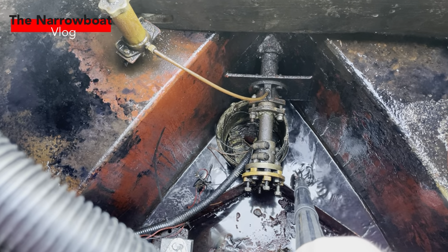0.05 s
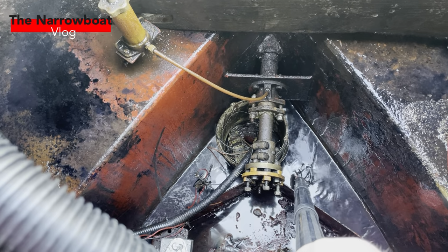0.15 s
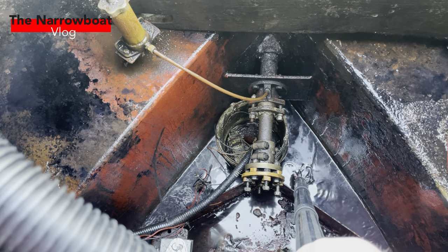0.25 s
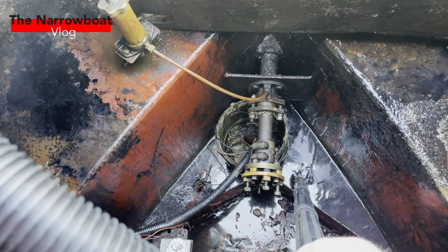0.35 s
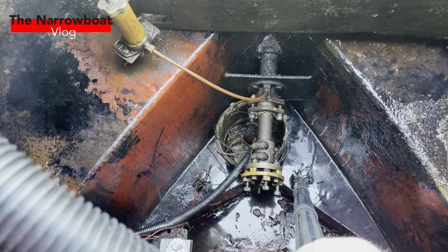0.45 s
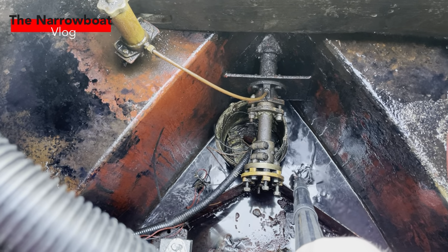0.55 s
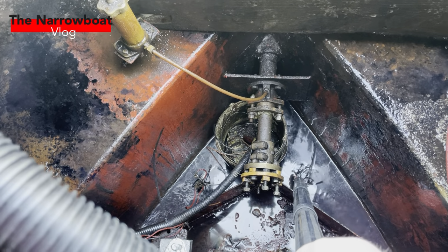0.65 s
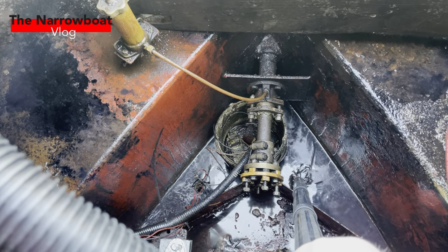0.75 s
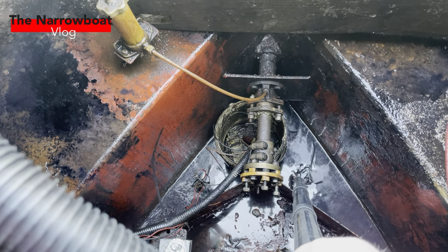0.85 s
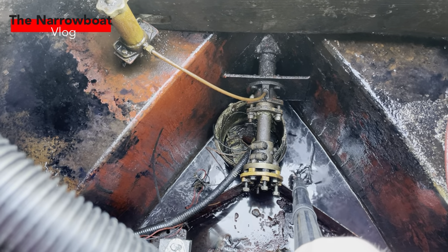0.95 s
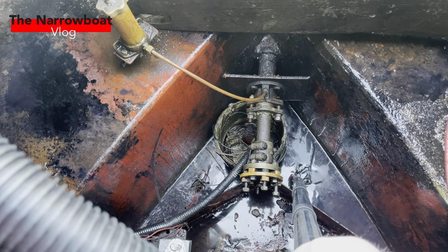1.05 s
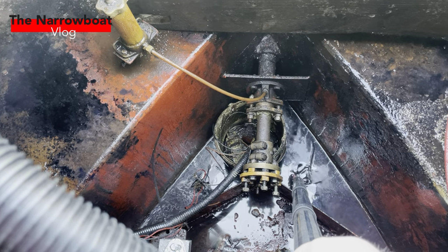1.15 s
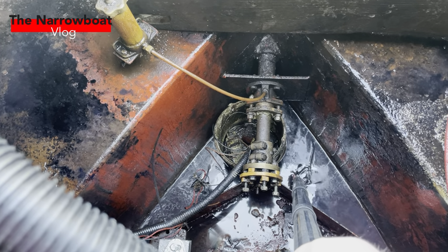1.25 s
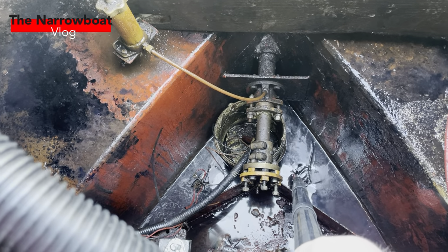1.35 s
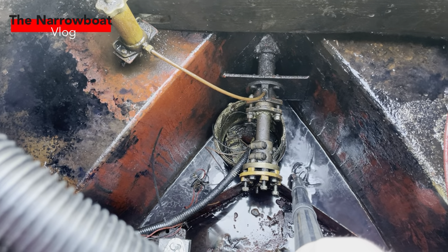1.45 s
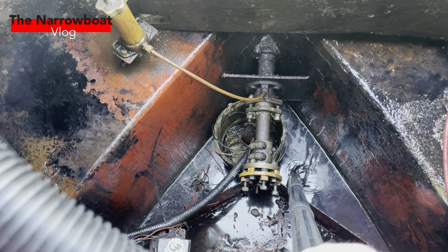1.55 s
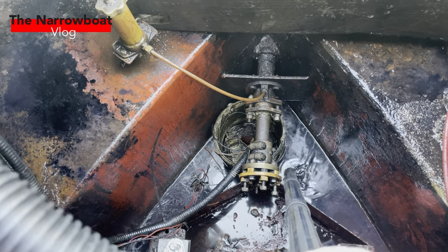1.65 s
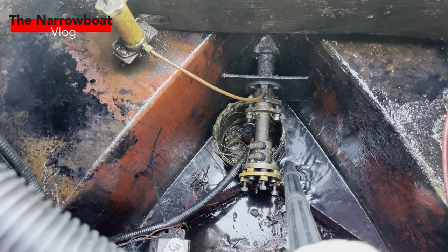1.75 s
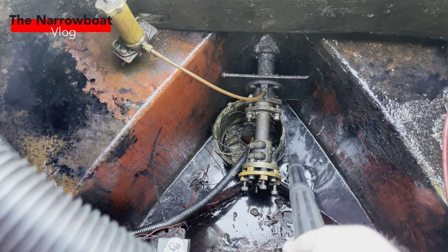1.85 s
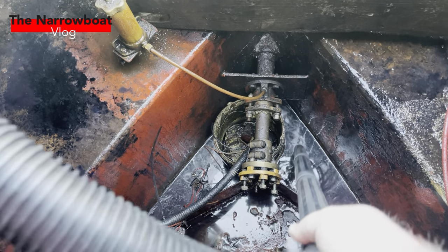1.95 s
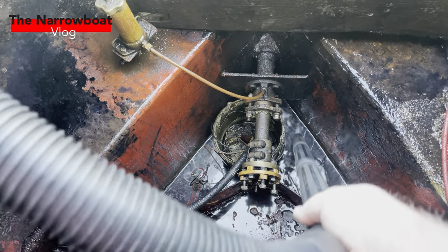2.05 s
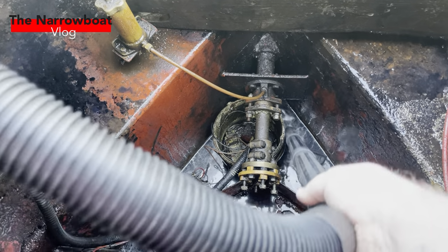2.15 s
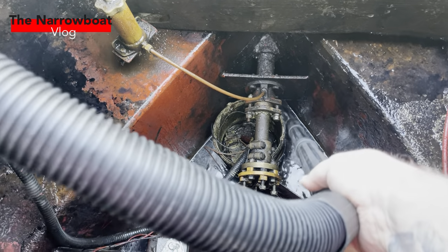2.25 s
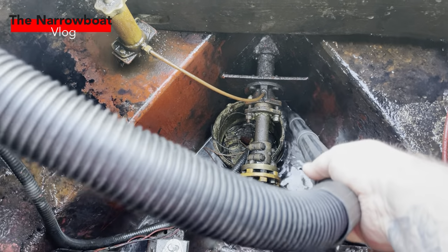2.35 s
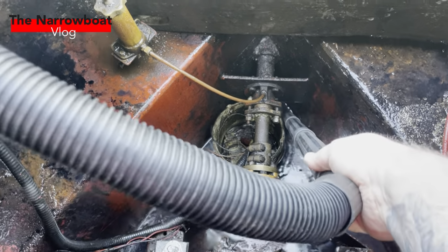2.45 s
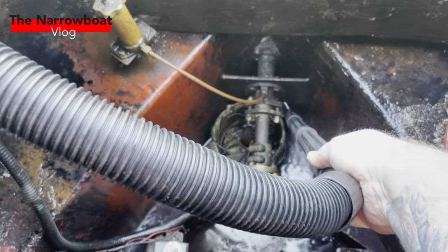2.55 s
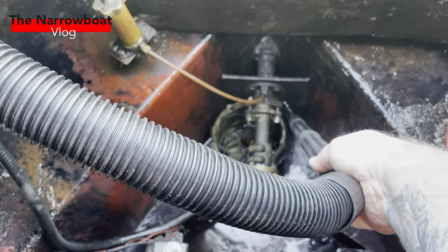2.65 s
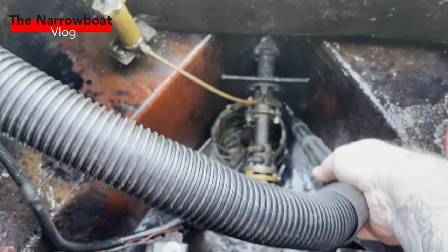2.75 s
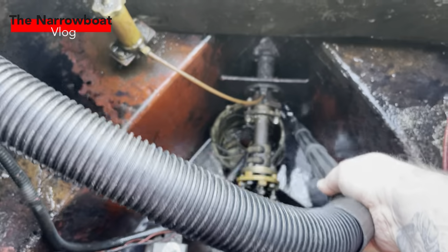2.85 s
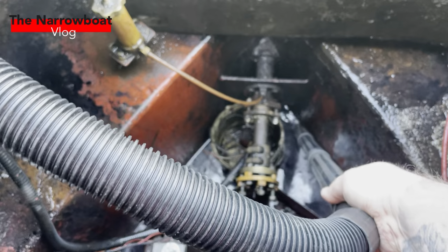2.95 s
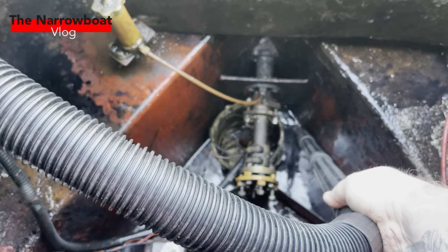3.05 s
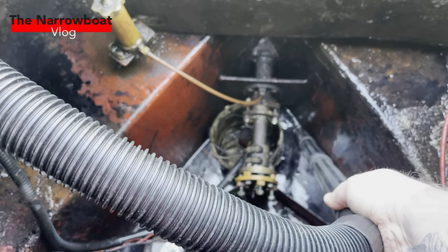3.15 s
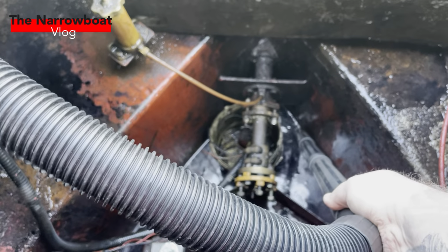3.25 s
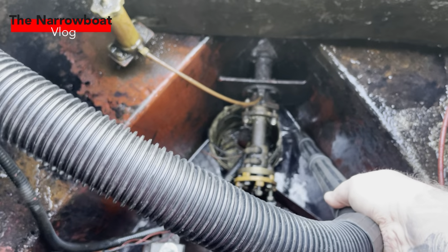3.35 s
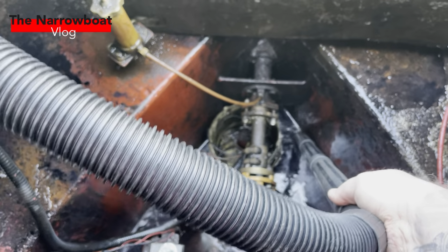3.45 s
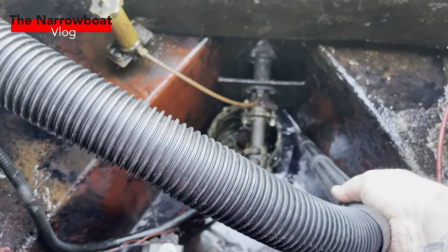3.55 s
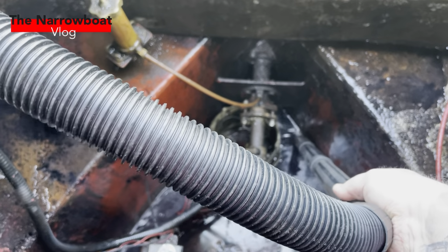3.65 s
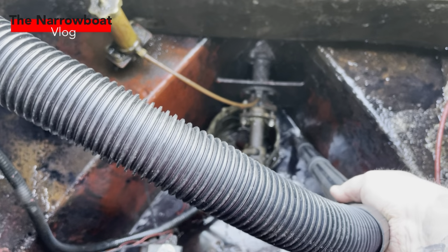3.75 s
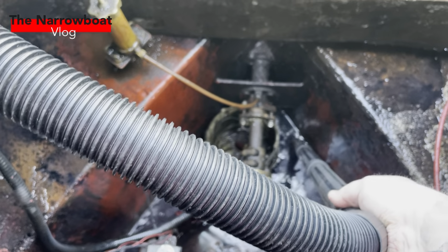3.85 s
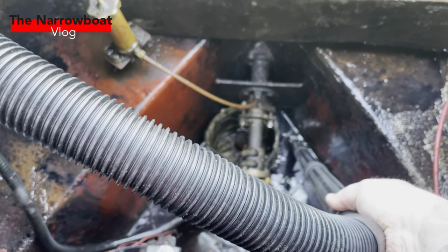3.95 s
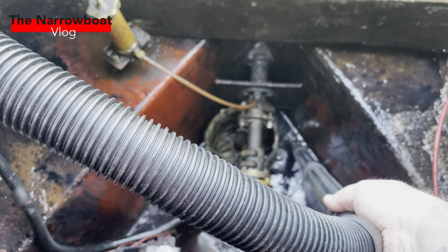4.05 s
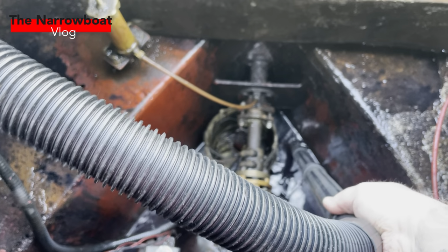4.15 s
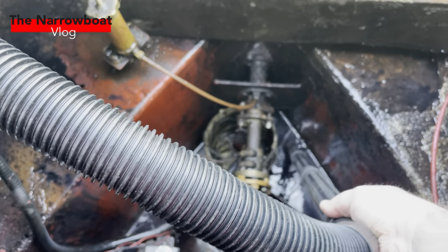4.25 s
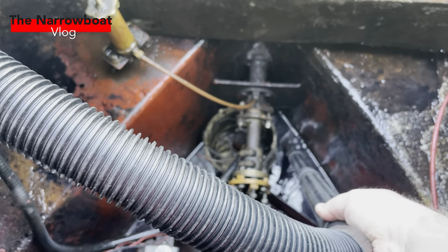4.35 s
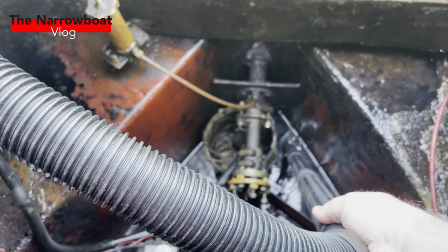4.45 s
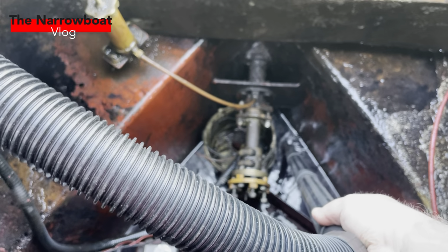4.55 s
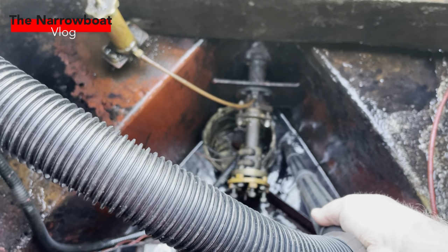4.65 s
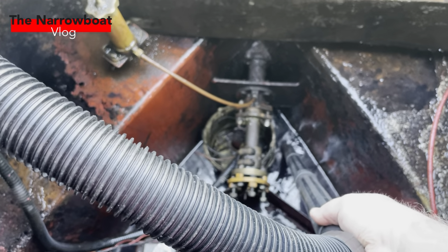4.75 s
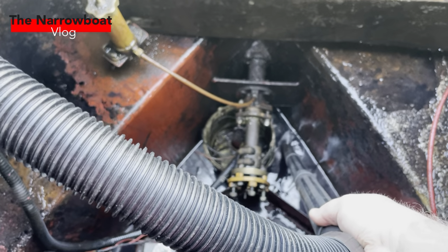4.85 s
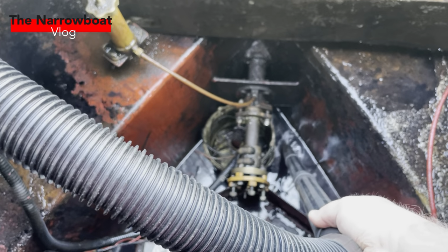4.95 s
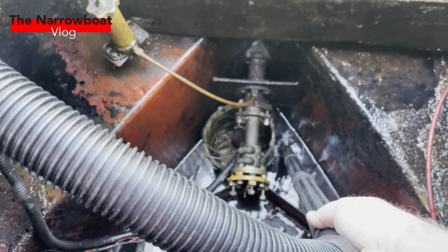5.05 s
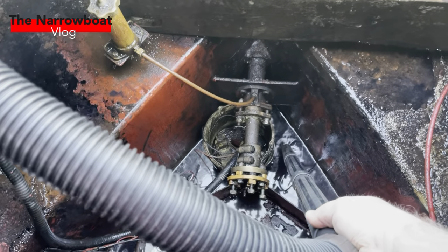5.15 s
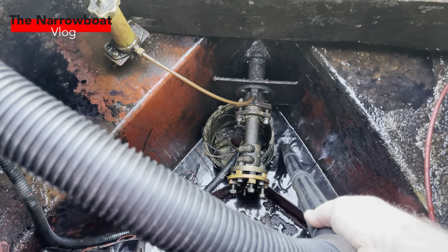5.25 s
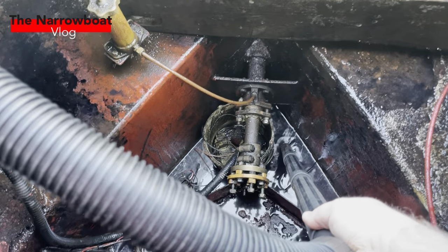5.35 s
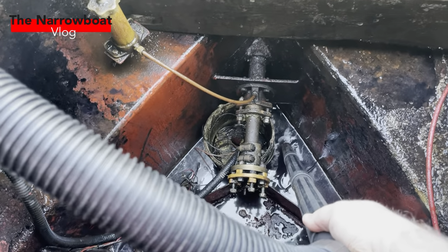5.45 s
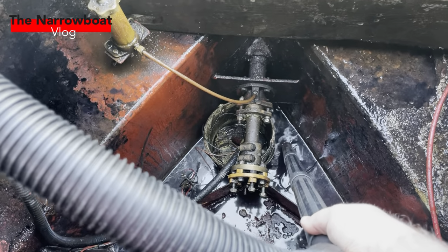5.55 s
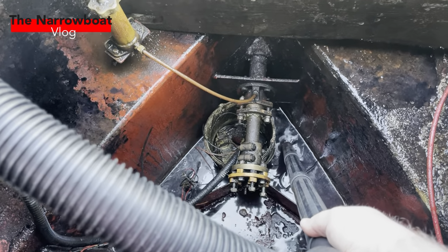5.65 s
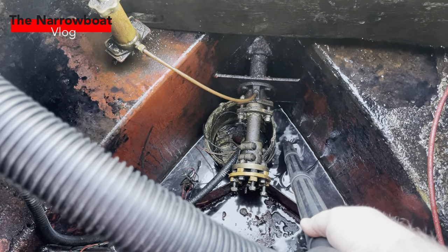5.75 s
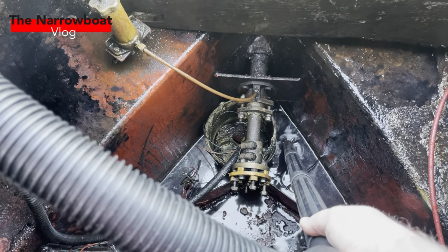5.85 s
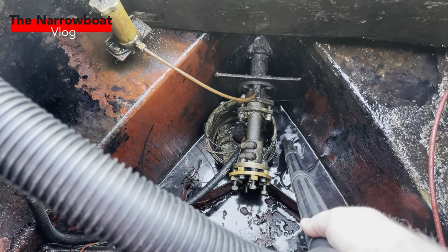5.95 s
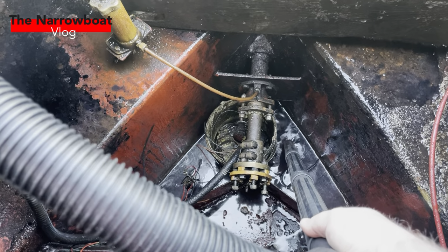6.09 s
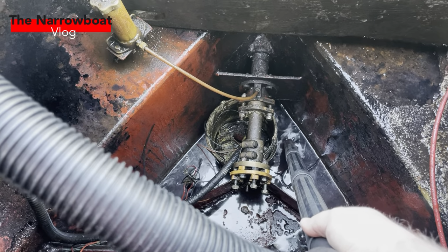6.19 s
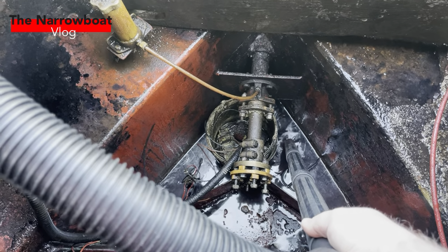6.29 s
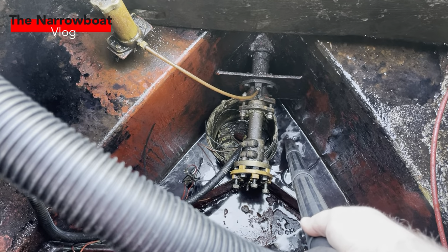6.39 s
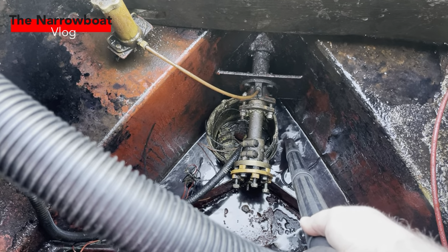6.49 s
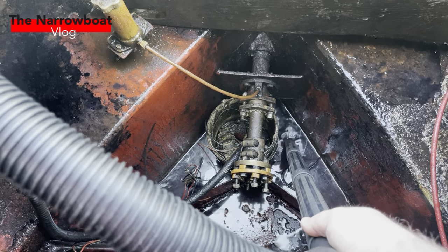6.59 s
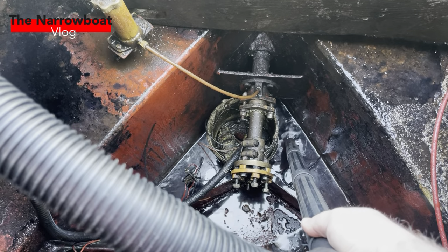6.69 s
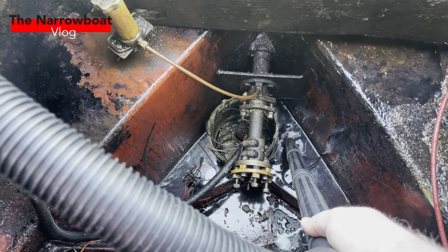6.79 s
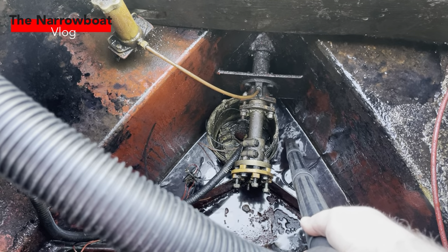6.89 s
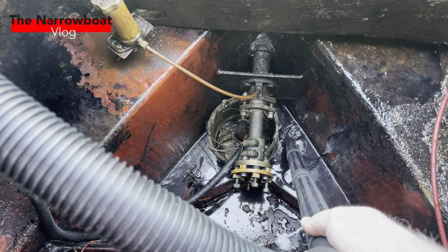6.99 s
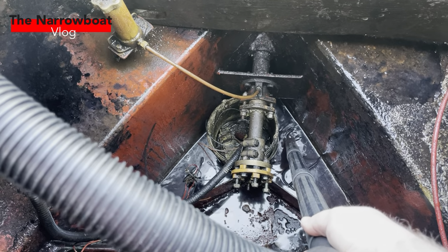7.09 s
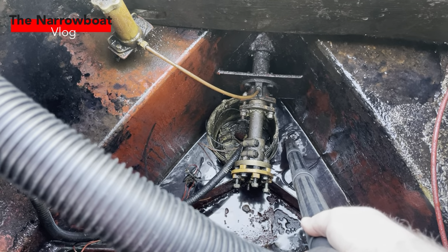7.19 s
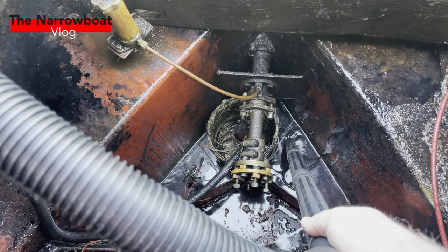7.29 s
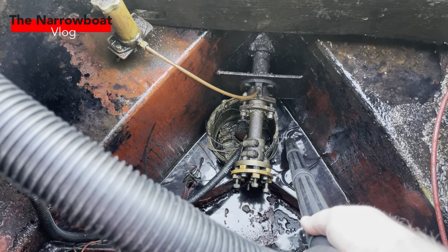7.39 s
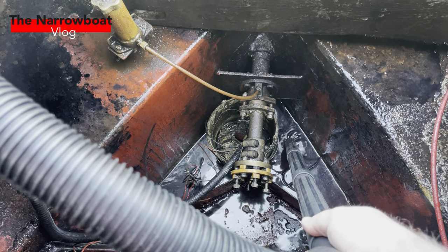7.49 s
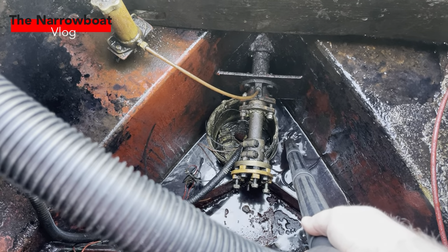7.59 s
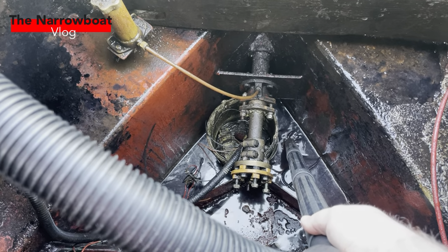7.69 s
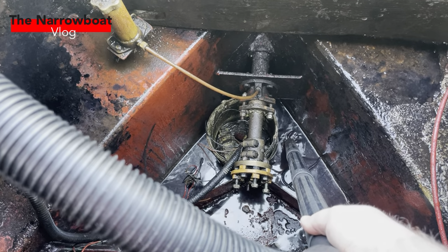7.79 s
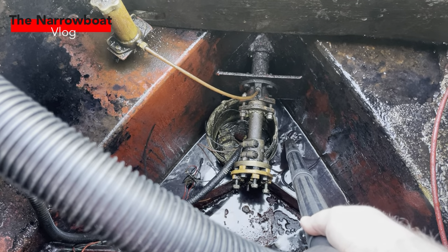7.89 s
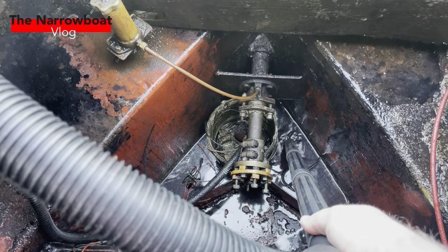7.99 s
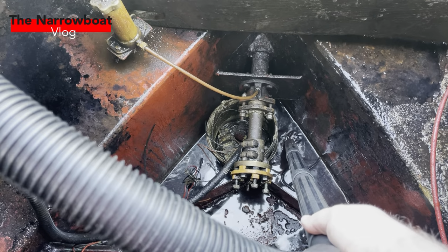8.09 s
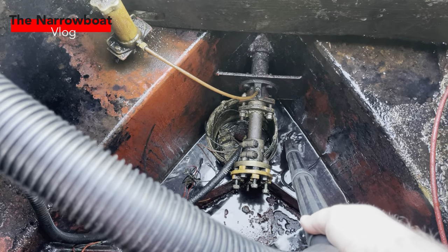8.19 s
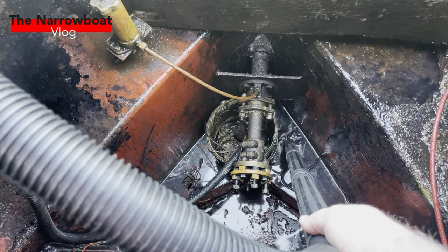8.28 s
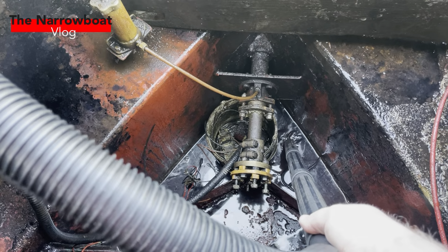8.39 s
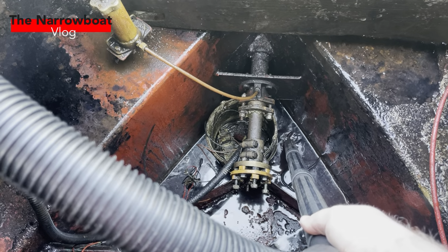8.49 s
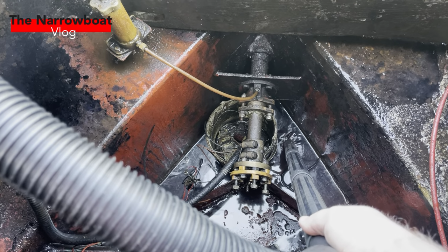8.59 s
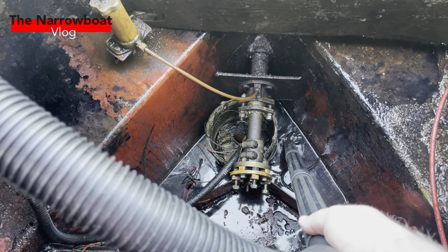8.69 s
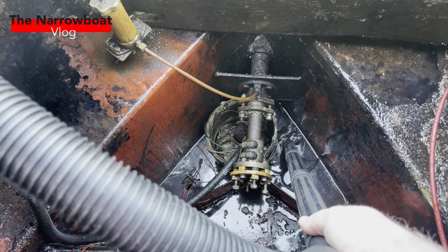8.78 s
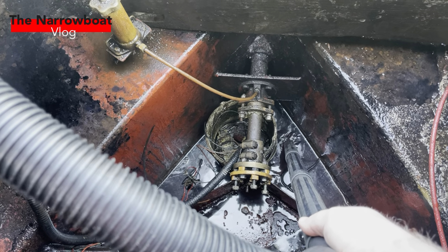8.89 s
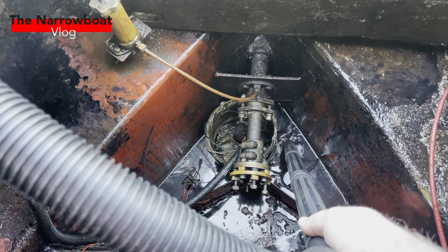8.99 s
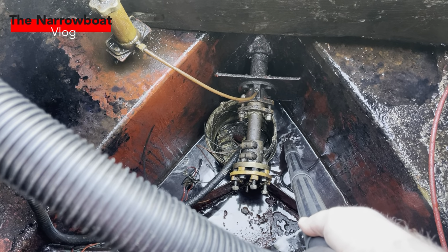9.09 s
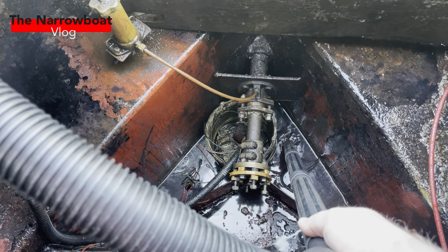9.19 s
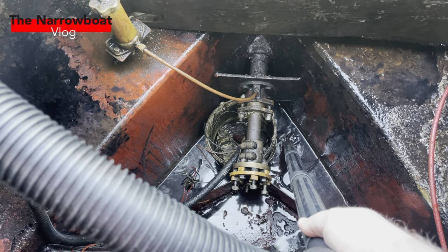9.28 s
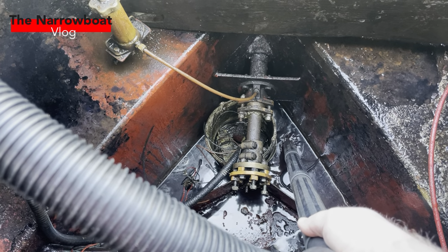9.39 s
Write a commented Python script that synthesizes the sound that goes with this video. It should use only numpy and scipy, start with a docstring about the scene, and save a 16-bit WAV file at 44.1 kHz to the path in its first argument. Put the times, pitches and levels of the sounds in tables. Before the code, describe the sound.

Close rushing suction from a vacuum nozzle drowns to a muffled gurgle, bursts free with spits and hose jolts, and settles into steady airy hiss.

```python
"""First one hears air hissing at the nozzle of a wet-and-dry vacuum, on the steel floor of a boat's engine
compartment: shaped noise that chokes while the nozzle is under water, then surges. Behind it, broad noise
makes the rush, and noise through narrow resonances makes the steel box ring. Slugs of water are sagging low
tones, spits are bright puffs, and the tumbling in the hose is lumpy low noise. The motor drones in the box
and whines in thin tones, over a narrow low humming. The place is heard up close, in stereo."""
import sys
import numpy as np
from scipy import signal
from scipy.fft import rfft, irfft, next_fast_len
from scipy.io import wavfile
from scipy.ndimage import uniform_filter1d

SR = 44100
rng = np.random.default_rng(int(sys.argv[2]) if len(sys.argv) > 2 else 0)


def master(y):
    """Save y as 16-bit WAV."""
    cut = np.clip(np.atleast_2d(y).T, -1, 1)
    pcm = np.round(cut * 32767)  # scale
    wavfile.write(sys.argv[1], SR, pcm.astype(np.int16))


N = 415863
LONG = next_fast_len(N + SR)  # the scene plus at least a second of room for filtering
FREE_DB = -25.5  # hiss level of a freely flowing nozzle
# the nozzle leaves the first corner and dives, clears the water, settles; the spread softens each change
DIVES_S, CLEARS_S, SETTLES_S, SPREAD_S = 1.51, 2.44, 4.7, 0.049

# air through the nozzle: free, choked under water, surging as it clears, settling
# columns: t/s, hiss level/dB, rush level/dB, hiss tilt/(dB per octave), hollow body of the hiss/dB
SUCTION = [(0, -26, -31, 3.5, 5), (.62, -26, -32.5, 1.5, 1.5), (.78, -24.5, -31.5, 1.5, 2.5),
           (1.12, -26.5, -31.5, 3, 3.5), (1.37, -25, -32, 1.5, 1.5), (1.42, -26.5, -35, 1, 0),
           (1.47, -32, -38.5, 0, 0.5), (1.53, -35.5, -39, 0.5, 1), (1.62, -41.5, -37.5, 3.5, 1),
           (1.95, -40.5, -39, 2, 1), (2.05, -37.5, -38, -1.5, -3), (2.4, -38.5, -39, -1, -4),
           (2.437, -34, -32, -1.2, 0.5), (2.46, -29.5, -35, 1.5, 8), (2.49, -27.5, -36.5, 1.5, 5),
           (2.6, -24.5, -27.5, -0.5, 4), (2.75, -24, -29, 0, 2), (2.92, -22, -29.5, -0.5, 2),
           (3.1, -23, -30.5, -0.5, 2), (3.33, -25.5, -35.5, 0.5, 0.5), (3.58, -26, -33.5, -1.5, -1.5),
           (3.75, -28.5, -38, 0, 3), (3.95, -28, -34.5, -1.5, 1), (4.23, -29.5, -39, -0.5, -0.5),
           (4.27, -28.5, -40, 0, -2), (4.5, -28.5, -36, 1.5, 0.5), (5.5, -29.5, -41.5, 0.9, -0.5),
           (6.3, -30, -38.5, 0.5, -1), (7, -29.5, -41, 0, -2.5), (8.3, -29, -39, 0, -2.5),
           (9.43, -29, -38, -0.5, -3)]
# broad colour of the hiss: f/Hz, relative level/dB
HISS_COLOUR = [(700, -21), (1300, -2.5), (2100, -0.5), (2350, -4), (2550, -1.5), (2850, -3.5), (3250, -2.5),
               (3950, -3), (4800, -2.5), (5300, -2.5), (5550, -5), (5900, -.5), (6450, -3.5), (6800, -0.5),
               (7000, -2), (7250, 0.5), (7600, -3.3), (8350, -2.2), (8700, -4.5), (9000, -3.3),
               (10200, -4.6), (10900, -6.4), (11900, -4.7), (12600, -6.6), (13000, -5.1), (13600, -5.3),
               (14300, -7.3), (14650, -10.6), (15800, -12.5)]
# change of that colour in the corner where the nozzle starts: f/Hz, change/dB
CORNER_COLOUR = [(1200, -1), (2200, -1), (2900, 2), (3300, 0), (3850, -2), (4100, 0.5), (4350, -0.5),
                 (4600, 1.2), (4850, -3), (5300, 1.5), (5900, 1), (6300, 0), (6800, -3), (7200, -2),
                 (7700, -1), (8400, -2), (9000, 0), (16000, 0)]
# change of that colour from the moment the nozzle clears until it settles: f/Hz, change/dB
SURGE_COLOUR = [(1200, 0.5), (2000, -0.5), (2500, 1), (2900, 1.5), (3400, 1), (3700, -1), (4300, -0.5),
                (4900, 1), (5500, -0.5), (5900, -1.5), (6400, 1), (6900, -1.5), (7300, -2.5), (7700, 0),
                (16000, 0)]
BODY_HZ, BODY_SAG_HZ, BODY_BACK_S = 4540, 1140, 1  # the body drops as the nozzle clears, then climbs back


def hiss():
    """Turbulent air at the nozzle: noise shaped frame by frame, flickering with the water it tears along."""
    hop = 128
    frames, hz = N // hop + 5, np.fft.rfftfreq(512, 1 / SR)
    shape, t = (frames, len(hz)), np.arange(frames) * hop / SR

    # random flicker
    ripple_db = 0.9 * drift(shape, frames=250, bins=2)  # the colour shifts as the nozzle moves
    spray_db = 0.88 * drift(shape, frames=9, bins=17)
    spray_db *= np.clip(hz / 10000, .3, 1.15)  # spray flickers most in the treble
    choked = np.clip((FREE_DB - curve(SUCTION, t, axis=1)) / 12, 0, 1)[:, None] ** 2
    gurgle_db = 1.3 * choked * drift(shape, frames=7, bins=8)  # a drowned nozzle gurgles in patches
    gust_db = 0.63 * drift((frames, 1), frames=12, bins=1)  # the whole flow is unsteady

    # planned changes of colour
    tilt_db = curve(SUCTION, t, axis=3)[:, None] * np.log2((hz + 1) / 6000)
    body_hz = BODY_HZ - BODY_SAG_HZ * (t > CLEARS_S) * np.exp(-((t - CLEARS_S) / BODY_BACK_S) ** 2)
    octaves_off = np.log2((hz + 1) / body_hz[:, None])
    body_db = curve(SUCTION, t, axis=4)[:, None] * np.exp(-(octaves_off / .36) ** 2)
    in_corner = (1 - after(t, DIVES_S))[:, None]
    surging = (after(t, CLEARS_S) - after(t, SETTLES_S))[:, None]
    place_db = in_corner * np.interp(hz, *np.transpose(CORNER_COLOUR))
    place_db += surging * np.interp(hz, *np.transpose(SURGE_COLOUR))

    level_db = ripple_db + spray_db + gurgle_db + gust_db + tilt_db + body_db + place_db
    spectra = stereo_spectra(shape, hz) * colour(HISS_COLOUR, hz) * gain_of(level_db)
    air = signal.istft(spectra.transpose(0, 2, 1), nperseg=512, noverlap=512 - hop)[1][:, :N]
    return evened(fine_ripple(air)) * gain_of(curve(SUCTION, seconds(), axis=1))


def fine_ripple(air):
    """A fine, fixed, random ripple of the spectrum that fades toward the treble."""
    ripple_db = 2 * drift((1, LONG // 2 + 1), frames=1, bins=200)
    ripple_db /= 1 + (np.fft.rfftfreq(LONG, 1 / SR) / 8000) ** 2
    return irfft(rfft(air, LONG) * gain_of(ripple_db), LONG)[:, :N]


# broad colour of the rush: f/Hz, relative level/dB
RUSH_COLOUR = [(220, -40), (320, -4.5), (500, -1), (650, -5.5), (880, 1), (1200, -9.5), (2000, -5),
               (3500, -15), (6000, -46)]


def rush():
    """Broad rush of the air: coloured noise whose level follows the suction."""
    return broad_noise(RUSH_COLOUR) * gain_of(curve(SUCTION, seconds(), axis=2))


# upper air modes of the steel compartment:
# f/Hz, nominal width/Hz, relative level/dB, left minus right/dB, right leads/rad
UPPER_MODES = [(413, 17, -8.5, -3, 0.6), (458, 12, -6, 2, 3), (496.6, 13, -6, -10, 1.64),
               (587, 38, -8, -9, 2.5), (616.4, 10.4, -12.5, -25, -0.7), (694, 27, -10.5, -16.5, -1.3),
               (691, 18, -0.5, 7, -2), (662, 22, -13, 1, 0.5), (736, 26, -14, 7, 3),
               (802, 10, -6.5, 13, 1.5), (830.5, 41, -5, -11, 1.4), (855, 42, -12, 6, 0),
               (886, 30, -9, 15, 2), (959, 51, -3.5, -1, 2), (1138, 17, -3, -6, 4), (1186, 31, -3, 2, 1.93),
               (1274, 52, -5.5, -1.5, 1.38), (1068, 31, -9, -6.5, 4.5), (1380, 42, -5.5, -4.5, 2.05),
               (1516, 40, -10, 2.5, 3.5), (1575, 26, -9, 6, 1.5), (1692, 52, -12, 3, 1),
               (1738, 18, -7.5, -10, -1.5), (1876, 54, -7.5, 4, 0.2), (1953, 24, -11, 0, 0),
               (2121, 51, -10.5, 0, 0.4), (2270, 340, -29, 13, -1.5), (2553, 31, -11.5, 0, 0.5),
               (3264, 66, -13.5, -2, 2)]
RING_DB, RING_SHARE = -32, 0.69  # level at free flow; share of the hiss's swings in dB that it follows


def compartment_ring():
    """Air modes of the steel box, excited by noise that swells and ebbs with the hiss."""
    swing_db = curve(SUCTION, seconds(), axis=1) - FREE_DB
    return mode_noise(UPPER_MODES) * gain_of(RING_DB + RING_SHARE * swing_db + 1.22 * flicker(.06))


# modes that ring only in the first corner:
# f/Hz, nominal width/Hz, relative level/dB, left minus right/dB, right leads/rad
CORNER_MODES = [(507, 23, 1, -4, 0.94), (704, 20, -2, 4, 0.69), (705, 35, 1, 1, .8), (875, 54, 0, -1, .8),
                (1040, 30, -9, 1, 1.1), (1123, 40, 0, -1, 1), (1480, 40, -17, -1, 1.2)]
# modes heard while the nozzle is drowned:
# f/Hz, nominal width/Hz, relative level/dB, left minus right/dB, right leads/rad
DROWNED_MODES = [(705, 44, -1, 0.92, 0.89), (1250, 110, -7, 1, 1.5), (1710, 120, -15, 1, 1.2),
                 (2200, 100, -11, 1, 1.1), (2550, 78, -8, 1, 1.1), (3050, 90, -15, 1, 1.2),
                 (3500, 140, -12, 1, 1.2)]
CORNER_DB, DROWNED_DB, GURGLE_DB, GURGLE_S = -35.5, -43, 1.5, .05


def places():
    """Noise through the modes of the first corner, then of the drowned, gurgling nozzle."""
    dived = after(seconds(), DIVES_S)
    under = dived * (1 - after(seconds(), CLEARS_S))
    corner = gain_of(CORNER_DB) * (1 - dived) * mode_noise(CORNER_MODES)
    gurgle = gain_of(DROWNED_DB + GURGLE_DB * flicker(GURGLE_S))
    return corner + gurgle * under * mode_noise(DROWNED_MODES)


# drops that spit at the nozzle's rim: t/s, puff level/dB, f/Hz
SPITS = [(0.841, -15, 9900), (0.9956, -26, 10100), (2.0255, -21, 10000), (2.0685, -32, 10500),
         (2.4244, -32, 10200), (2.8215, -8, 11700), (3.0285, -11, 10400), (4.5295, -10, 9900),
         (7.3327, -36, 10000)]
SPIT_S = 0.00096  # rise of a spit's envelope


def spits():
    """Drops at the rim: short puffs of smoothed noise on a bright tone, with the hiss's phase lead."""
    out, t = np.zeros((1, N)), np.arange(400) / SR
    for s, db, hz in SPITS:
        puff = uniform_filter1d(rng.standard_normal(len(t)), size=11) * t * np.exp(-t / SPIT_S)
        add(out, s, gain_of(db) * puff / abs(puff).max() * np.sin(2 * np.pi * hz * t))
    f, _, lead, _ = np.transpose(STEREO_IMAGE)
    lead = np.interp(np.fft.rfftfreq(LONG, 1 / SR), f, lead)
    sides = np.array([[0], [1]])  # only the right side is turned
    return irfft(rfft(out, LONG) * np.exp(1j * lead * sides), LONG)[:, :N]


# slugs of water that jolt the hose: t/s, nominal level/dB, starting f/Hz, length/s (dies away within four)
SLUGS = [(0.271, -34, 70, 0.034), (0.78, -26, 126, 0.038), (0.824, -16.5, 61.6, 0.016),
         (0.88, -28, 75.5, 0.055), (1.287, -31, 61.9, 0.023), (1.827, -31, 110, 0.032),
         (2.24, -31, 59.2, 0.03), (2.356, -20.5, 103, 0.037), (2.465, -28, 78.1, 0.03),
         (2.553, -20, 93.5, 0.043), (2.607, -18.5, 84, 0.035), (2.644, -22, 75, 0.027),
         (2.68, -15, 125, 0.021), (2.718, -24, 75, 0.035), (2.755, -31, 69.6, 0.024),
         (2.895, -22, 76, 0.04), (3.22, -25.5, 70, 0.027), (6.52, -34, 53.8, 0.027),
         (6.85, -29, 84.6, 0.017), (7.243, -30, 67.3, 0.023)]


def slugs():
    """Slugs jolting the hose: a few low cycles of three partials that sag in pitch."""
    out = np.zeros((2, N))
    for s, db, hz, length in SLUGS:
        u = np.arange(0, 4 * length, 1 / SR) / max(length, .01)  # time in lengths
        swell = 3 * u * np.exp(1 - 3 * u)
        phase = 2 * np.pi * (hz * length * (u - 0.069 * u ** 2) + rng.random())
        partials = 1.3 * np.sin(phase) + 0.32 * np.sin(0.57 * phase) + 0.75 * np.sin(1.61 * phase)
        add(out, s, gain_of(db) * swell * partials)
    return out


# water tumbling in the hose: t/s, rumble level/dB before lumps and slugs
TUMBLE = [(0.0, -37.5), (0.84, -40), (1.0, -49), (1.25, -47), (1.42, -47.5), (1.8, -43), (2.2, -39),
          (2.6, -40), (3.49, -43), (4.31, -47), (5.4, -46), (6.3, -47.5), (6.77, -47.5), (7.04, -38),
          (8.03, -45.5), (8.35, -46.5), (9.43, -51.5)]
# broad colour of the rumble: f/Hz, relative level/dB
RUMBLE_COLOUR = [(50, -11), (70, 2.5), (105, 6.5), (150, -8), (300, -21), (500, -52)]
# colour of the deep throb under the rumble: f/Hz, relative level/dB
THROB_COLOUR = [(20, -33), (33, -5), (45, 3), (58, 9), (75, -11), (110, -47)]
THROB_DB, LUMPS_DB, LUMP_S = -1, 3.5, .07  # throb against rumble; both come in random lumps
# each slug stirs the water up around it: levels against the slug, times before and after it
STIR_DB, STIR_THROB_DB, STIR_RISE_S, STIR_FALL_S = -7.5, -12, 0.02, 0.025


def tumbling_water():
    """Water tumbling in the hose: rumble and deep throb, both noise in random lumps."""
    rumble = broad_noise(RUMBLE_COLOUR) * gain_of(tumble_level(0, STIR_DB))
    return rumble + broad_noise(THROB_COLOUR) * gain_of(tumble_level(THROB_DB, STIR_THROB_DB))


def tumble_level(calm_db, stir_db):
    """Level in dB of lumpy water; the power stirred up around every slug is added."""
    t = seconds()
    power = gain_of(2 * (curve(TUMBLE, t, axis=1) + calm_db + LUMPS_DB * flicker(LUMP_S)))
    for s, db, _, _ in SLUGS:
        near = slice(max(round((s - .5) * SR), 0), round((s + .5) * SR))
        late = t[near] - s
        fade = np.exp(-abs(late) / np.where(late < 0, STIR_RISE_S, STIR_FALL_S))
        power[near] += gain_of(2 * (db + stir_db)) * fade
    return 10 * np.log10(power)


# deep air modes of the steel compartment:
# f/Hz, nominal width/Hz, relative level/dB, left minus right/dB, right leads/rad
DEEP_MODES = [(140.5, 19, -18, 10, -0.38), (167.4, 7.3, -9, 2.5, -0.033), (199.5, 42, -7.5, 3, -0.32),
              (237, 13.5, -9, 7, 1.4), (262, 15, -14.5, 3, 0.8), (277, 26, -9, 8, 0),
              (335, 33, -19, 11, 1.9), (365.8, 22, -5, 0.8, 1.4)]
# drone of the motor in the deep modes: t/s, level/dB
DRONE = [(0, -34), (.6, -33.5), (1.2, -32.5), (1.6, -38), (2.2, -36), (2.65, -25), (3.1, -31.5),
         (3.4, -31.5), (3.9, -30.5), (4.5, -31.5), (5.2, -32.5), (5.6, -33), (6.1, -33.5), (6.8, -34),
         (7.2, -34.5), (8, -32.5), (8.3, -36), (8.7, -31.5), (9.43, -33)]


def motor_drone():
    """Drone of the motor: noise through the deep modes of the compartment."""
    return mode_noise(DEEP_MODES) * gain_of(curve(DRONE, seconds(), axis=1))


# narrow humming bands: f/Hz, wander/Hz rms, left minus right/dB, right leads/rad
HUM_BANDS = [(274.4, 4.06, 4.5, 0.77), (192.3, 6.84, 6, 0.24), (823, 6.43, 0.5, 1.06),
             (239.2, 2.75, 3.5, -0.25), (169.3, 4.06, 3.5, -0.53)]
# level of each humming band over time: t/s, then level/dB of each band in the order of HUM_BANDS
HUM_LEVELS = [(0, -32, -39.5, -44, -43, -43), (.75, -38, -39, -38, -48, -46),
              (1.2, -30.5, -39, -47, -44, -44), (1.65, -50, -41, -51, -41.5, -46),
              (2.2, -38, -40, -38.5, -39.5, -42), (2.5, -27.5, -40, -35, -39, -44),
              (2.75, -35, -41, -32.5, -33, -39), (2.93, -24.5, -38, -28, -32, -39),
              (3.1, -26.5, -40, -33.5, -37, -41), (3.4, -43, -45, -39, -52, -59),
              (3.9, -29, -33, -39, -33, -50), (4.12, -38, -31, -35, -46, -50),
              (4.33, -30.5, -35, -36, -46, -55), (4.44, -37, -43, -38.5, -49, -57),
              (4.55, -39, -31.5, -40, -46, -48), (4.8, -36.5, -40, -39, -40, -44),
              (5.2, -41, -38, -40, -39, -51), (5.6, -39, -41.5, -46, -39, -50),
              (6.0, -34.5, -36.5, -39, -45, -32.5), (6.25, -38, -35, -49, -34, -37),
              (6.5, -45, -39, -39, -40, -36), (6.68, -35, -48, -54, -57, -49),
              (6.85, -42, -35, -36, -48, -34.5), (7.2, -35.5, -38, -45, -28.5, -43),
              (7.45, -33, -38.5, -40, -46, -50), (7.8, -34, -42.5, -44, -49, -52),
              (8.05, -47, -37, -39, -51, -45), (8.27, -24, -35, -40, -40, -44),
              (8.5, -65, -35.5, -39.5, -38, -43), (8.95, -32, -36.5, -42, -40, -44),
              (9.2, -49, -33, -37, -44, -48), (9.43, -25.5, -36, -43, -39, -53)]
HUM_SWELL_DB, HUM_SWELL_S = 3, .045  # random swelling of each band


def narrow_hum():
    """Narrow low humming, swelling and fading irregularly: sines with random pitch and level."""
    out = np.zeros((2, N))
    for k, (hz, wander_hz, lean_db, lead) in enumerate(HUM_BANDS):
        phase = 2 * np.pi * np.cumsum(hz + wander_hz * flicker(.04)) / SR
        sides = np.sin(phase + np.array([[0], [lead]])) * gain_of([[lean_db / 2], [-lean_db / 2]])
        swell_db = HUM_SWELL_DB * np.minimum(flicker(HUM_SWELL_S), 1.1)
        out += np.sqrt(2) * sides * gain_of(curve(HUM_LEVELS, seconds(), axis=k + 1) + swell_db)
    return out


# thin tones of the motor, shaft and fan blades: f/Hz, wander/Hz, left level/dB, right level/dB
WHINES = [(563.7, 1.5, -58, -40.5), (5060, 5, -56, -62)]


def motor_whine():
    """Thin sines of motor, shaft and fan blades, wandering together in pitch and strength."""
    slow = drift((N // 512 + 2, 2), frames=13, bins=1)
    wander, swell = (np.interp(np.arange(N) / 512, np.arange(len(slow)), c) for c in slow.T)
    out = np.zeros((2, N))
    for hz, wander_hz, left_db, right_db in WHINES:
        tone = np.sqrt(2) * np.sin(2 * np.pi * np.cumsum(hz + wander_hz * wander) / SR)
        out += gain_of([[left_db], [right_db]] + 0.47 * swell) * tone
    return out


# stereo image of the noise by frequency: f/Hz, likeness/0-1, right leads/rad, left minus right/dB
STEREO_IMAGE = [(0, .95, 0.1, 0.1), (35, .9, .1, .3), (70, .75, .1, -.5), (130, .8, 0, .3),
                (300, .7, .1, 1.5), (1300, .4, 1.8, 0), (2300, .3, 3, .5), (2800, .05, 1.5, -1.5),
                (3300, .22, .3, -3), (3750, .4, .1, -1.5), (4150, .68, .3, -.4), (4700, .58, 1., -2),
                (5300, .48, 1.8, -5.5), (5750, .33, .4, -8.3), (6200, .58, .25, -4.8),
                (6800, .72, .2, -1.3), (7250, .5, .4, -3), (7420, .2, -1.5, -2.5), (7700, .99, -3.12, 0),
                (8850, .998, -3.16, 0), (9100, .74, -3.7, 0), (9700, .66, -4.8, 0), (10200, .72, -5.8, 0),
                (10400, .99, -6.25, 0), (11600, .99, -6.33, 0), (11800, .66, -7.6, 0),
                (12300, .62, -8.6, 0), (12500, .998, -9.41, 0), (13700, .998, -9.44, 0),
                (14000, .6, -10.2, 0), (14400, .45, -11, 0), (14700, .98, -12.55, 0),
                (16000, .99, -12.57, 0)]


def stereo_spectra(shape, hz):
    """Random stereo spectra: partly alike, shifted in phase and level."""
    f, *columns = np.transpose(STEREO_IMAGE)
    alike, lead, lean_db = (np.interp(hz, f, c) for c in columns)
    alike = np.clip(alike, 0, 1)
    left, other = rng.standard_normal((2, *shape)) + 1j * rng.standard_normal((2, *shape))
    right = (alike * left + np.sqrt(1 - alike ** 2) * other) * np.exp(1j * lead)
    return np.array([left * gain_of(lean_db / 2), right * gain_of(-lean_db / 2)])


def low_band():
    """Frequencies in Hz of the lower third of the spectrum."""
    return np.fft.rfftfreq(LONG, 1 / SR)[:LONG // 6]


def broad_noise(points):
    """Steady coloured noise in stereo; the mean of the channels has rms 1."""
    hz = low_band()
    return evened(irfft(colour(points, hz) * stereo_spectra(hz.shape, hz), LONG)[:, :N])


def mode_noise(modes):
    """One noise heard through steep modes; each leans to a side and has its own phase lead."""
    hz = low_band()
    f, width, db, lean_db, lead = np.transpose(modes)[:, :, None]
    power = gain_of(2 * db) / (1 + (1.79 * (hz - f) / width) ** 2) ** 2
    left = np.sqrt((power * gain_of(lean_db)).sum(0))
    right = np.sqrt((power * gain_of(-lean_db)).sum(0))
    right = right * np.exp(1j * np.angle((power * np.exp(1j * lead)).sum(0)))
    noise = rfft(rng.standard_normal(len(hz) * 2 - 2)) / np.sqrt(len(hz) - 1)
    return evened(irfft(np.array([left, right]) * noise, LONG)[:, :N])


def drift(shape, frames, bins):
    """Random field of standard deviation 1, smoothed twice over so many frames and bins."""
    z = rng.standard_normal(shape)
    for _ in range(2):
        z = uniform_filter1d(z, max(round(frames), 1), 0)
        z = uniform_filter1d(z, max(round(bins), 1), 1)
    return z / z.std()


def flicker(smooth_s):
    """Slow random course of about rms 1 over the whole scene."""
    slow = drift((N // 512 + 2, 1), frames=smooth_s * SR / 512, bins=1)[:, 0]
    return np.interp(np.arange(N) / 512, np.arange(len(slow)), slow)


def seconds():
    """Time of every sample."""
    return np.arange(N) / SR


def after(t, s):
    """Soft step from 0 to 1 around time s."""
    return .5 + .5 * np.tanh((t - s) / SPREAD_S)


def gain_of(db):
    """Decibels to gain."""
    return 10 ** (np.asarray(db) / 20)


def evened(x):
    """Scales so that the mean of the channels has rms 1."""
    return x / np.sqrt(np.mean(np.atleast_2d(x).mean(0) ** 2))


def colour(points, hz):
    """Gain of a spectrum: straight dB lines on a log axis, -80 dB below the first point."""
    f, db = np.transpose(points)
    return gain_of(np.interp(np.log(hz + 1), np.log(f + 1), db, left=-80))


def curve(rows, t, axis):
    """One column of a table over time, in straight lines."""
    rows = np.array(rows)
    return np.interp(t, rows[:, 0], rows[:, axis])


def add(mix, s, sound):
    """Adds a sound at time s to every channel."""
    part = mix[:, round(s * SR):][:, :len(sound)]
    part += sound[:part.shape[1]]


def scene():
    """All sources together, from the nozzle to the motor."""
    nozzle = hiss() + rush() + compartment_ring() + places()
    water = spits() + slugs() + tumbling_water()
    return nozzle + water + motor_drone() + narrow_hum() + motor_whine()


EDGE_HZ = 15760


def record(dry):
    """The band limit of the recorder: a steep low-pass at EDGE_HZ."""
    low_pass = signal.firwin(1023, EDGE_HZ, window=("kaiser", 9), fs=SR)
    return signal.oaconvolve(dry, low_pass[None], "same")


dry = scene()
out = record(dry)
master(out)
```